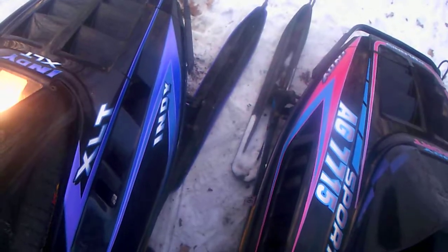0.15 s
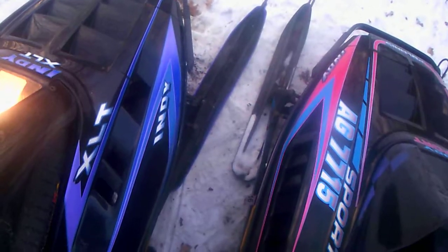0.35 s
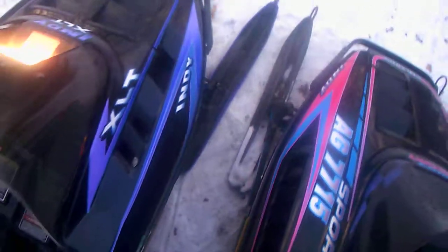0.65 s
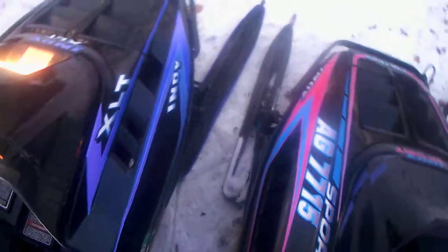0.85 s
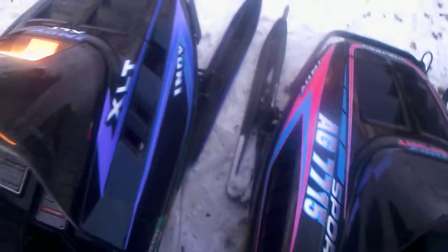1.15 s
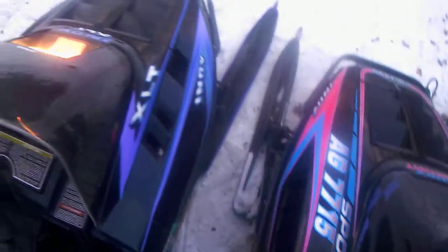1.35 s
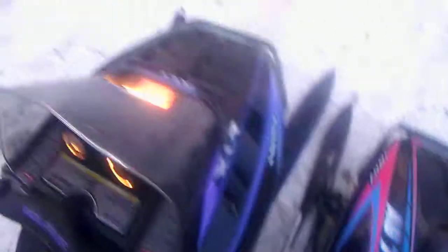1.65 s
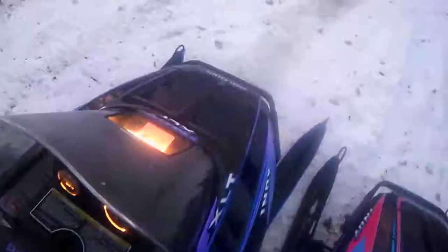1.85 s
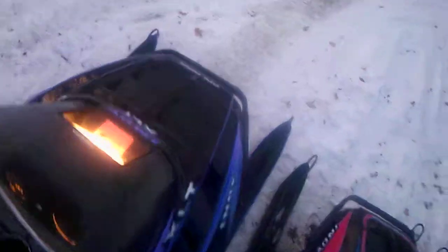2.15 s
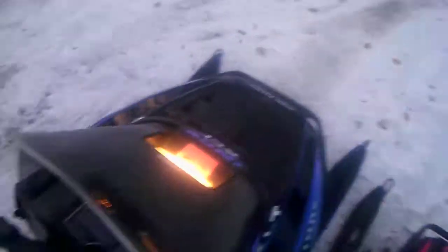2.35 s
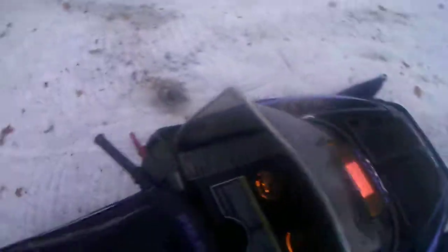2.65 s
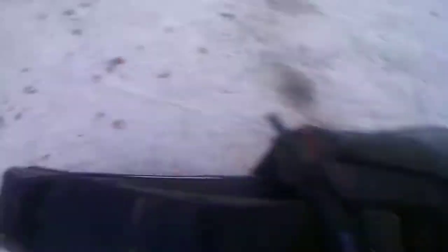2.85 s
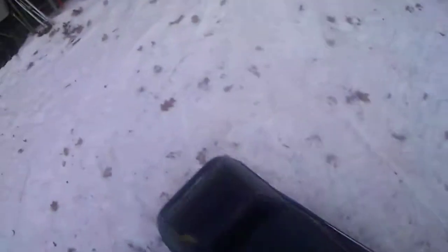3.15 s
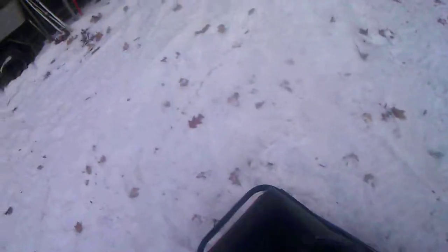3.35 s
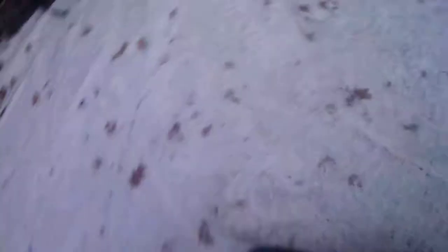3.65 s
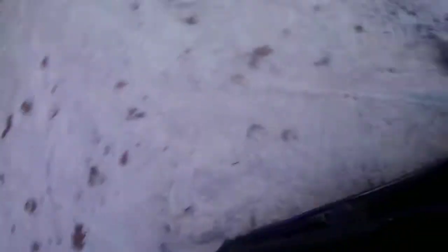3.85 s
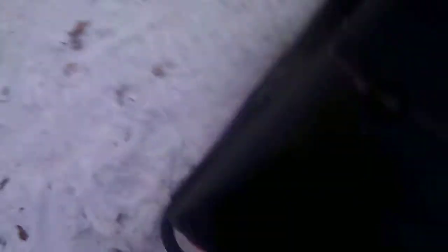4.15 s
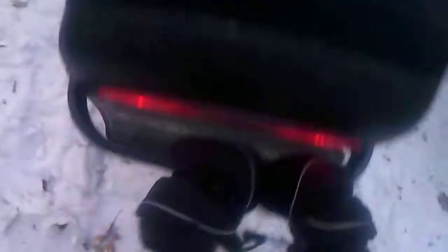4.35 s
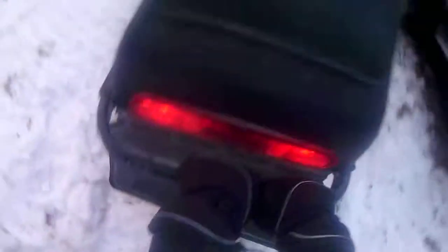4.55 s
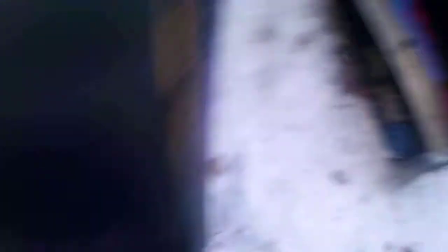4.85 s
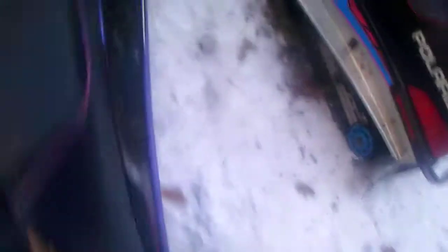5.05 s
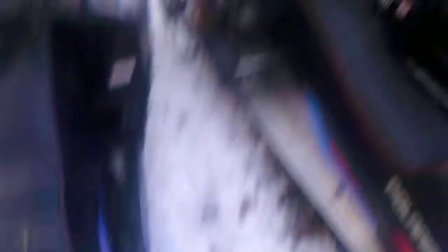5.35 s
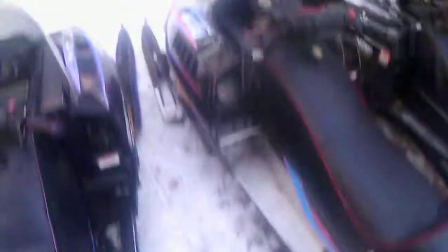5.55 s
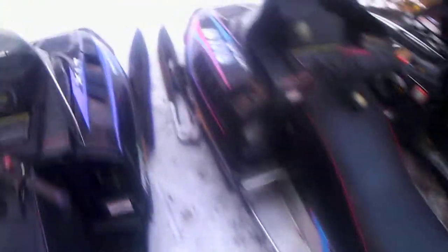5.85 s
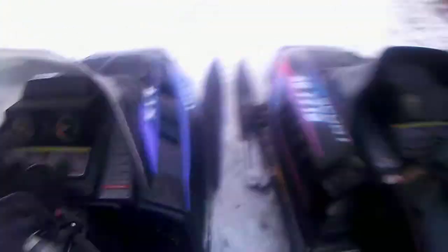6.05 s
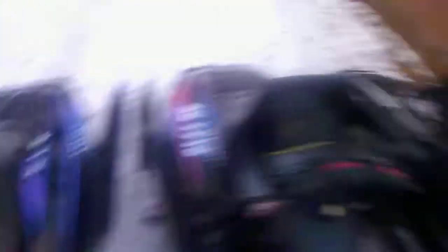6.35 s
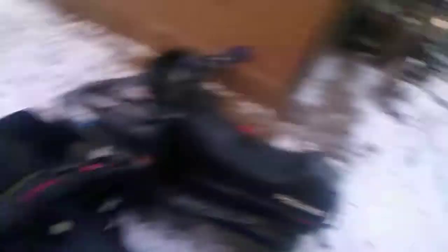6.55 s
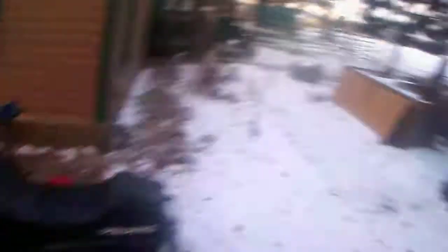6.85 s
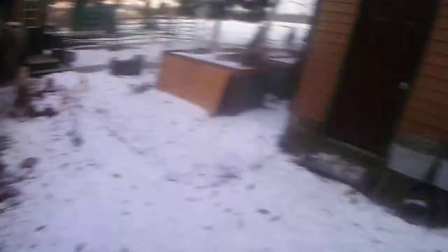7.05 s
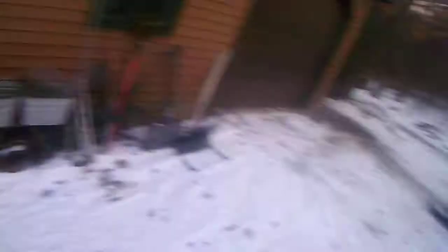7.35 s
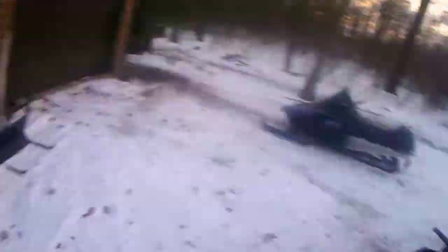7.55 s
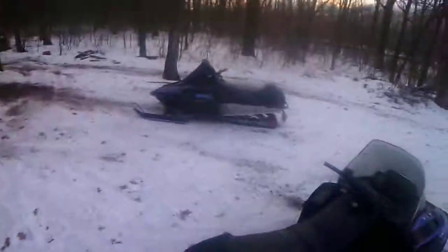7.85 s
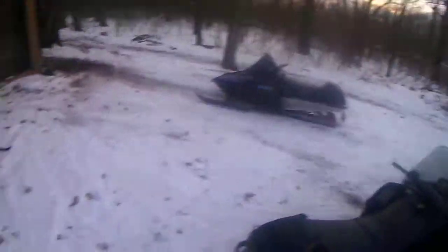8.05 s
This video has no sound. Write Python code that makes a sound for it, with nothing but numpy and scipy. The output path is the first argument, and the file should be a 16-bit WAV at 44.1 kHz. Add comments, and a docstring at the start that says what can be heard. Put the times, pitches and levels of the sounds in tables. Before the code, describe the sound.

A snowmobile's two-stroke engine blips, sinks from a buzzing rattle to a popping idle, then is switched off, leaving quiet air and wind thumps.

```python
"""Snowmobile in a snowy yard

A three-cylinder two-stroke gets a blip of throttle, creeps along, drops to idle and is switched off.
Harmonics of the firing rate make the exhaust hum; uneven puffs ringing the silencer burble and pop.
Noise shaken by each firing rings case and panels as clatter; filtered noise makes snow, track and air.
The hand-held microphone is carried round behind the machine, and air buffets it as it swings.
"""
import sys
import numpy as np
from scipy import signal
from scipy.fft import rfft, irfft
from scipy.io import wavfile

SR = 44100
rng = np.random.default_rng(int(sys.argv[2]) if len(sys.argv) > 2 else 0)


def put_to_file(sound):
    """Save the sound as 16-bit audio at rate SR, in the file named by the first command-line argument."""
    columns = np.atleast_2d(sound).T  # one column per channel
    safe = np.clip(columns, -1, 1)
    whole_steps = np.round(safe * 32767)
    wavfile.write(sys.argv[1], SR, whole_steps.astype(np.int16))


N = 361165
T = np.arange(N) / SR
SHORT_T = T[:SR // 5]   # time axis of brief sounds

CYLINDERS = 3
STALL_S, STOPPED_S = 6.55, 6.9   # the crank slows from one to rest at the other


def from_db(db):
    """Logarithmic level: decibels to amplitude gain."""
    return 10 ** (np.asarray(db) / 20)


def rms_one(x):
    """Power normalisation: scale to unit rms."""
    return x / np.sqrt(np.mean(x ** 2) + 1e-20)


def peak_one(x):
    """Peak normalisation: scale to unit peak."""
    return x / np.abs(x).max()


def in_time(rows):
    """Linear interpolation: each column of a curve at every sample."""
    s, *columns = np.transpose(rows)
    return [np.interp(T, s, column) for column in columns]


def swell(centre_s, length_s):
    """Raised-cosine envelope: a smooth rise to 1 and fall."""
    return np.cos(np.pi * np.clip((T - centre_s) / length_s, -.5, .5)) ** 2


def drift(rate_hz):
    """Low-passed noise: smooth random variation of unit rms."""
    knot_hz = 400
    knots = rng.standard_normal(int(T[-1] * knot_hz) + 1000)
    lowpass = signal.butter(2, min(rate_hz, 150), fs=knot_hz, output="sos")
    slow = signal.sosfilt(lowpass, knots)[900:]   # drop the filter's onset
    return np.interp(T * knot_hz, np.arange(len(slow)), rms_one(slow))


def resonate(x, hz, width_hz, order=1):
    """Band-pass resonance: sound passes near one frequency; order 2 has steeper skirts."""
    low_hz = np.hypot(hz, width_hz / 2) - width_hz / 2
    band = signal.butter(order, [low_hz, low_hz + width_hz], "band", fs=SR, output="sos")
    return signal.sosfilt(band, x + 1e-18)


def burst(t60_s):
    """Exponential decay: a spray of contacts as noise that falls 60 dB in t60_s."""
    return rng.standard_normal(len(SHORT_T)) * from_db(-60 * SHORT_T / t60_s)


def add(out, start_s, sound):
    """Superposition: mix a sound in at a time."""
    at = max(round(start_s * SR), 0)
    out[at:at + len(sound)] += sound[:max(N - at, 0)]


def event_samples(phase):
    """Phase counting: the samples at which a running count passes a whole number."""
    return np.flatnonzero(np.diff(np.floor(phase)))


# path of the microphone: time_s, position (0 beside the bonnet, 1 behind the seat)
MICROPHONE_PATH = [(0, 0.02), (.5, 0.06), (1.7, 0.26), (2.1, 0.57), (2.7, 0.85), (4.3, 1), (5.5, 0.69),
                   (7, 0.72)]


def from_position(front, rear):
    """Directivity: a level that shifts as the microphone moves from bonnet to rear."""
    behind, = in_time(MICROPHONE_PATH)
    return front + behind * (rear - front)


# resonances of the exhaust pipe: pitch_hz, bonnet_level_db, rear_level_db
PIPE_RESPONSE = [(35, -45, -34), (70, -48, -48.5), (86.5, -48, -43), (100.8, -36, -29.5),
                 (118.2, -36, -29.2), (146.6, -47.5, -48.5), (159, -46.5, -35), (168.5, -50.5, -41),
                 (181, -42.5, -48.5), (196, -56.5, -56), (210.5, -43.5, -65.5), (260, -55.5, -58.5),
                 (324, -48, -60), (418, -58, -63), (520, -66.5, -68)]


def pipe(hz):
    """Pipe resonance: level in dB of an exhaust tone of this pitch, where the microphone stands."""
    pitch_hz, *sides = np.transpose(PIPE_RESPONSE)
    front_db, rear_db = [np.interp(np.log(hz), np.log(pitch_hz), db) for db in sides]
    return from_position(front_db, rear_db)


# weaker exhaust tones: multiple (of crank speed), bonnet_level_db, rear_level_db
WEAK_ORDERS = [(4, -57, -60), (5, -54, -62.5), (8, -70, -72.5), (11, -57.5, -79), (12, -65, -72.5)]


def hum(firings, rate, third_db=-7, waver_db=1.2, octave_waver_db=1.63, order_waver_db=3.5):
    """Harmonic series: regular firings give clean tones; unequal cylinders add unsteady crank orders."""
    angle = 2 * np.pi * firings
    out = from_db(pipe(rate) + waver_db * drift(5)) * np.sin(angle)
    out += from_db(pipe(2 * rate) + octave_waver_db * drift(10)) * np.sin(2 * angle)
    out += from_db(pipe(3 * rate) + third_db + octave_waver_db * drift(10)) * np.sin(3 * angle)
    for multiple, front_db, rear_db in WEAK_ORDERS:
        db = from_position(front_db, rear_db) + order_waver_db * drift(8)
        phase_wander = rng.uniform(0, 2 * np.pi) + .5 * drift(20)
        out += from_db(db) * np.sin(multiple * angle / CYLINDERS + phase_wander)
    return np.sqrt(2) * out   # levels are rms


# chambers of the silencer: pitch_hz, width_hz, level_db
SILENCER_CHAMBERS = [(46, 22, -3.5), (109.1, 14, 5.5), (161, 50.5, -9), (203, 51.5, -11.5),
                     (316.6, 70, -18.5)]


def silencer(puffs):
    """Parallel resonators: gas puffs ring the chambers, with alternating polarity."""
    out = np.zeros(len(puffs))
    for k, (hz, width_hz, db) in enumerate(SILENCER_CHAMBERS):
        out += (-1) ** k * from_db(db) * resonate(puffs, hz, width_hz)
    return out


BURBLE_DB, BURBLE_BEHIND_DB = -37, -5.5   # at the bonnet; change behind the seat
TUNED_HZ, TUNED_OCTAVES, TUNED_DB = 94, 0.22, 1   # the burble rises near this firing rate


def burble(firings, rate, muffle_hz=400):
    """Impulse excitation: charges burn harder or miss, and the differences ring the silencer."""
    at = event_samples(firings)
    puffs = np.zeros(N)
    puffs[at] = rng.uniform(-1, 1, len(at)) / np.sqrt(np.maximum(rate[at], 70))   # weaker when fast
    muffler = signal.butter(2, muffle_hz, fs=SR, output="sos")
    rung = signal.sosfilt(muffler, silencer(puffs))
    tuned = np.exp(-(np.log2(rate / TUNED_HZ) / TUNED_OCTAVES) ** 2)
    level_db = from_position(BURBLE_DB, BURBLE_DB + BURBLE_BEHIND_DB) + TUNED_DB * tuned
    return from_db(level_db) * rms_one(rung)


CLATTER_DB, CRUISE_HZ, CLATTER_DB_PER_OCTAVE = -39, 182, 8.5   # at this firing rate; growth with speed
TREBLE_HZ = 2000   # panels above this are treble
TREBLE_DB, TREBLE_BEHIND_DB = -7.5, -10   # treble trim at the bonnet; change behind the seat
FARTHEST_S, FARTHEST_LENGTH_S, FARTHEST_DB = 3.7, 3.9, -1.7   # microphone farthest from the engine
# the drive rattles harder for a moment: centre_s, length_s, boost_db
RATTLE_BOOSTS = [(0.201, 0.27, 3.5), (0.335, 0.26, 3.5), (1.653, .16, 2.5)]
# engine case and panels, before treble trim: pitch_hz, width_hz, bonnet_level_db, rear_level_db
PANEL_MODES = [(472, 360, -14.5, -16), (634, 70, -16.5, -23), (721.7, 18, -17, -18.5),
               (827, 98, -18.5, -19.5), (995.7, 75, -10.5, -12.5), (1064, 33, -6.5, -17.5),
               (1307, 260, -7, -9), (1450.4, 110, -3.5, -5.5), (1625, 129, -4, -3.5), (1758, 130, -7.5, -5),
               (2385, 350, -10.5, -8.5), (2744, 230, -5, -7), (3047, 6.7, -8, -10.5), (3112, 130, -5.5, -5),
               (3237, 150, -8, -4.5), (3507, 240, -14, -12.5), (3870, 410, -20.5, -24.5),
               (4660, 210, -27, -39), (5600, 650, -20.5, -32.5), (6650, 440, -18.5, -21.5),
               (7500, 420, -22.5, -13), (8040, 360, -24.5, -27)]


def clatter(firings, rate, slap_decay=1.7, churn=0.72, uneven_db=2.5, flutter_db=1.23, wobble=0.11,
            recurring_share=0.1):
    """Modal excitation: firings slap pistons and shake the drive; contacts ring case and panels."""
    speed_octaves = np.log2(np.maximum(rate, 21) / CRUISE_HZ)
    level_db = CLATTER_DB + CLATTER_DB_PER_OCTAVE * speed_octaves
    level_db += sum(db * swell(s, length_s) for s, length_s, db in RATTLE_BOOSTS)
    level_db += FARTHEST_DB * swell(FARTHEST_S, FARTHEST_LENGTH_S)
    treble_db = from_position(TREBLE_DB, TREBLE_DB + TREBLE_BEHIND_DB)

    turn = firings / CYLINDERS % 1
    firing_strength = from_db(uneven_db * rng.standard_normal(N // 100).clip(-2, 2))
    slap = firing_strength[firings.astype(int)] * np.exp(-slap_decay * (firings % 1))
    shake = (churn + slap) * (1 + wobble * np.cos(2 * np.pi * turn))
    # part of the contacts recur at the same crank angle on every turn
    recurring = np.interp(turn * 512, np.arange(512), rng.standard_normal(512))
    out = np.zeros(N)
    for hz, width_hz, front_db, rear_db in PANEL_MODES:
        fresh = rng.standard_normal(N)
        contacts = np.sqrt(1 - recurring_share) * fresh + np.sqrt(recurring_share) * recurring
        db = from_position(front_db, rear_db) + treble_db * (hz > TREBLE_HZ) + flutter_db * drift(14.6)
        out += from_db(db) * rms_one(resonate(shake * contacts, hz, width_hz, order=2))
    return from_db(level_db) * out


# air on the microphone as it is swung faster or slower: time_s, level_db
RUMBLE_LEVEL = [(0, -36.5), (1.1, -43.5), (2.0, -34.5), (2.7, -40.5), (3.4, -41), (4.2, -30), (6.0, -37.5),
                (6.8, -40), (8.19, -38)]
# air and jolts against the microphone: centre_s, peak_db, pitch_hz, length_s
PRESSURE_SWELLS = [(1.578, -15.5, 19.5, 0.25), (2.105, -15.5, 14, 0.42), (3.525, -20, 19, 0.38),
                   (3.656, -2.5, 18, 0.1), (3.719, -5.5, 30, .14), (4.457, -9.5, 12.73, 0.27),
                   (5.889, -13.5, 14.2, 0.22), (7.461, -22.5, 17.8, 0.34), (8.068, -22, 16.2, 0.39)]


def wind():
    """Pressure fluctuation: slow swells on the moving microphone, over a light rumble."""
    rumble = rms_one(resonate(rng.standard_normal(N), 22, 20.7, order=2))
    out = from_db(in_time(RUMBLE_LEVEL)[0]) * rumble
    for s, db, hz, length_s in PRESSURE_SWELLS:
        t = np.arange(-length_s / 2, length_s / 2, 1 / SR)
        envelope = np.cos(np.pi * t / length_s) ** 2
        add(out, s - length_s / 2, from_db(db) * envelope * np.cos(2 * np.pi * hz * t))
    return out


HUSH_DB = -55
# colour of the open air: pitch_hz, spectral_density_db (per Hz, relative)
YARD_COLOUR = [(40, -7.5), (80, -7.5), (125, -5.5), (180, -3.5), (260, -14.5), (345, -10.5), (450, -17),
               (900, -22), (1300, -24.5), (1650, -22.5), (2100, -31), (3200, -36.5), (4900, -56.5),
               (7400, -41), (8700, -56)]


def yard():
    """Spectral shaping: steady noise is coloured into the dull, even hush of the open air."""
    hz, db = np.transpose(YARD_COLOUR)
    bin_hz = np.arange(N // 2 + 1) * SR / N
    colour = from_db(np.interp(np.log(bin_hz + 1), np.log(hz), db))
    return from_db(HUSH_DB) * rms_one(irfft(colour * rfft(rng.standard_normal(N)), N))


BLIP_S, BLIP_LENGTH_S = 0.19, 0.27   # the throttle blip: its centre time and length


def intake(firings, level_db=-44, lowest_db=-1, upper_db=-8, rough_db=9.0):
    """Order excitation: open throttle sounds the air box at crank speed and on its even orders."""
    angle = 2 * np.pi * firings / CYLINDERS
    honk = from_db(lowest_db) * np.sin(angle) + np.sin(2 * angle)
    honk += np.sin(4 * angle) + from_db(upper_db) * np.sin(6 * angle)
    return from_db(level_db + rough_db * drift(30)) * swell(BLIP_S, BLIP_LENGTH_S) * honk


IDLE_HZ, LATE_SHARE, LATE_DB = 85, .08, -31.5   # below this firing rate a share of the charges pop softly
# the hardest late firings: time_s, level_db (before the common trim)
HARD_POPS = [(0.083, -24.5), (0.128, -28.5), (0.54, -24), (0.565, -22), (0.765, -26.5), (1.646, -26.5),
             (4.074, -21), (4.192, -23), (4.322, -21), (4.452, -22.5), (4.537, -24.5), (4.599, -24.5),
             (4.684, -26.5), (4.837, -27.5), (4.937, -28), (5.093, -30), (5.503, -27), (5.755, -27),
             (5.824, -28)]


def pops(firings, rate, trim_db=-2.0, bark_hz=150, puff_s=0.0038, ring_db=-12):
    """Impulse response: unburnt mixture fires in one round puff, then the silencer rings."""
    lead_s = .01   # room for the puff's rise
    t, out = SHORT_T - lead_s, np.zeros(N)
    puff = peak_one(-np.sin(2 * np.pi * bark_hz * t) * np.exp(-(t / puff_s) ** 2))
    chamber_hz, chamber_width_hz, _ = SILENCER_CHAMBERS[1]
    ring = peak_one(resonate(puff, chamber_hz, chamber_width_hz, order=2))
    pop = peak_one(puff + from_db(ring_db) * ring)

    at = event_samples(firings)
    late = (rng.random(len(at)) < LATE_SHARE) & (rate[at] < IDLE_HZ) & (T[at] < SWITCH_S)
    soft_pops = [(s, LATE_DB) for s in T[at[late]]]
    for s, db in list(HARD_POPS) + soft_pops:
        add(out, s + 0.0045 - lead_s, from_db(db + trim_db) * pop)
    return out


# fainter ticks come at random while walking
FAINT_START_S, FAINT_END_S, FAINT_DB = 3.6, 5.5, -66.5
# crisp ticks of snow underfoot: start_s, level_db (before the common trim), body_db (against the crisp)
CLEAR_TICKS = [(0.8814, -52, -0.5), (1.945, -51, -6), (2.2358, -56, -6), (2.5147, -58, 2), (2.7482, -56, 4),
               (3.698, -55.5, -2), (4.0497, -50, 2.5), (4.1344, -55, 7)]


def ticks(trim_db=-1.5, t60_s=.03, rise_s=0.00065, count=9):
    """Brittle fracture: crusted snow snaps in a few clear ticks and a scatter of faint ones."""
    out = np.zeros(N)
    faint = [(s, FAINT_DB, 0) for s in rng.uniform(FAINT_START_S, FAINT_END_S, count)]
    for s, db, body_db in list(CLEAR_TICKS) + faint:
        snap = burst(t60_s) * (1 - np.exp(-SHORT_T / rise_s))
        crisp = peak_one(resonate(snap, 6200, 3200, order=2))
        body = peak_one(resonate(snap, 3200, 1400, order=2))
        add(out, s, from_db(db + trim_db) * (crisp + from_db(body_db) * body))
    return out


BUZZ_START_S, BUZZ_END_S, BUZZ_PEAK_DB = 3.33, 3.6, -62


def buzz(firings, t60_s=0.015, hz=6200, width_hz=3000):
    """Periodic impact: a loose trim piece taps once a turn of the crank as the engine slows."""
    out = np.zeros(N)
    for at in event_samples(firings / CYLINDERS):
        if BUZZ_START_S < T[at] < BUZZ_END_S:
            tap = peak_one(resonate(burst(t60_s), hz, width_hz, order=2))
            add(out, T[at], from_db(BUZZ_PEAK_DB) * tap)
    return out


DRAG_START_S, DRAG_END_S, DRAG_FADE_S, DRAG_DB = 3.95, 5.15, 0.16, -59   # fades lie outside start and end
# hollow scraping of the track: pitch_hz, width_hz, level_db
TRACK_MODES = [(510, 230, -2), (780, 176, 0), (2060, 500, -5.5), (3410, 290, -13.5)]


def track(lumpy_db=4.5):
    """Friction noise: the track drags through packed snow, its cleats scraping in uneven lumps."""
    fade_points_s = [DRAG_START_S - DRAG_FADE_S, DRAG_START_S, DRAG_END_S, DRAG_END_S + DRAG_FADE_S]
    moving = np.interp(T, fade_points_s, [0, 1, 1, 0])
    scrape = rng.standard_normal(N) * from_db(lumpy_db * drift(30))
    hollow = np.zeros(N)
    for hz, width_hz, db in TRACK_MODES:
        hollow += from_db(db) * rms_one(resonate(scrape, hz, width_hz, order=2))
    return from_db(DRAG_DB) * moving * rms_one(hollow)


# the loose drive clanks: time_s, level_db (before the common trim), pitch_hz
DRIVE_CLANKS = [(4.3148, -32.5, 1592), (4.7155, -32.5, 1695), (4.742, -36, 1720), (5.3048, -33, 1445),
                (5.3857, -33.5, 1435), (5.51, -31.5, 1414), (6.057, -34, 1590), (6.319, -44, 1537)]


def clanks(trim_db=-1.5, t60_s=0.07, overtone=1.13, overtone_db=-6):
    """Damped vibration: slack in the clutch is taken up with a short metal ring."""
    out = np.zeros(N)
    for s, db, hz in DRIVE_CLANKS:
        ring = np.sin(2 * np.pi * hz * SHORT_T)
        ring += from_db(overtone_db) * np.sin(2 * np.pi * hz * overtone * SHORT_T)
        dying = ring * from_db(-60 * SHORT_T / t60_s)
        add(out, s - .002, from_db(db + trim_db) * peak_one(resonate(dying, 1540, 810, order=2)))
    return out


SWITCH_S, SWITCH_PEAK_DB = 6.088, -41.5


def switch(t60_s=0.054):
    """Impact noise: the kill switch gives a plastic clack."""
    out = np.zeros(N)
    clack = resonate(burst(t60_s), 2300, 1700, order=2)
    add(out, SWITCH_S, from_db(SWITCH_PEAK_DB) * peak_one(clack))
    return out


RUSTLE_S, RUSTLE_LENGTH_S, RUSTLE_DB = 8.19, .12, -58


def rustle(hz=1500, width_hz=700):
    """Band-limited noise: something rustles close by in a short, soft scuff."""
    scuff = rms_one(resonate(rng.standard_normal(N), hz, width_hz, order=2))
    return from_db(RUSTLE_DB) * swell(RUSTLE_S, RUSTLE_LENGTH_S) * scuff


# with the ignition off the pistons only pump air: change of hum and of burble, and how long it takes
PUMPING_HUM_DB, PUMPING_BURBLE_DB, UNFIRED_FADE_S = -4.5, -8, 0.25
# engine speed before the stall: time_s, firing_rate_hz
ENGINE_SPEED = [(0, 172), (0.2, 213), (0.3, 223), (0.45, 203), (0.8, 188.5), (1.7, 164.5), (2.0, 151),
                (2.2, 137.5), (2.6, 120), (3.0, 106.4), (3.4, 94), (3.8, 86), (4.4, 83.6), (4.8, 79),
                (5.5, 73.3), (6.1, 73.8), (6.3, 57.4), (6.6, 31.5)]


def scene():
    """Common phase: one crankshaft drives exhaust, intake and clatter until it comes to rest."""
    rate, = in_time(ENGINE_SPEED)
    turning = np.interp(T, [STALL_S, STOPPED_S], [1, 0])
    firings = np.cumsum(rate * turning * (1 + .003 * drift(15))) / SR   # running count of firings
    unfired = np.interp(T, [SWITCH_S, SWITCH_S + UNFIRED_FADE_S], [0, 1])
    exhaust = from_db(PUMPING_HUM_DB * unfired) * turning * hum(firings, rate)
    exhaust += from_db(PUMPING_BURBLE_DB * unfired) * burble(firings, rate)
    gas = exhaust + intake(firings) + pops(firings, rate)
    running = np.interp(T, [STOPPED_S - .1, STOPPED_S + 0.16], [1, 0])
    machine = running * clatter(firings, rate * turning) + buzz(firings) + clanks() + switch()
    surroundings = wind() + yard() + ticks() + track() + rustle()
    return (gas + machine + surroundings)[None]


CUTOFF_HZ = 8700


def record(dry):
    """Clipping and band limit: a small microphone overloads on the hardest gust and lacks high treble."""
    overloaded = np.clip(dry, -.7, .7)
    lowpass = signal.ellip(10, .2, 80, CUTOFF_HZ, fs=SR, output="sos")
    return signal.sosfilt(lowpass, overloaded)


dry = scene()
out = record(dry)
put_to_file(out)
```